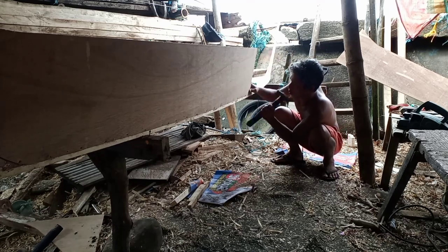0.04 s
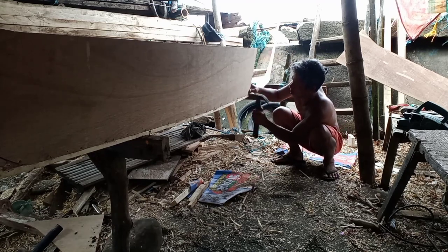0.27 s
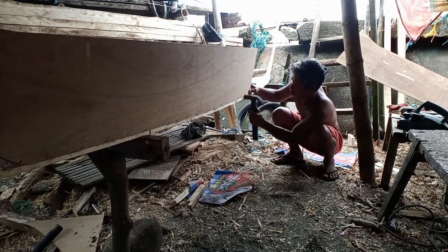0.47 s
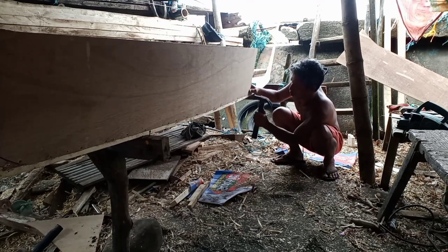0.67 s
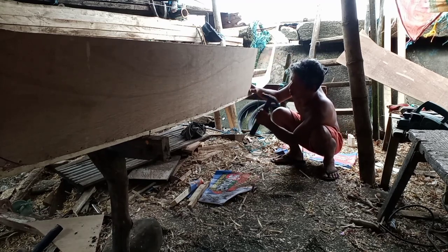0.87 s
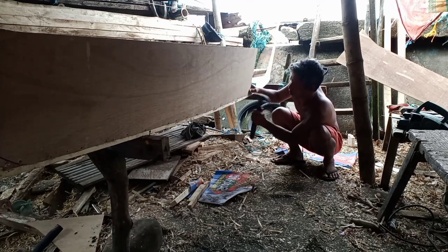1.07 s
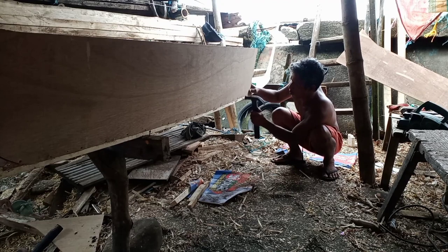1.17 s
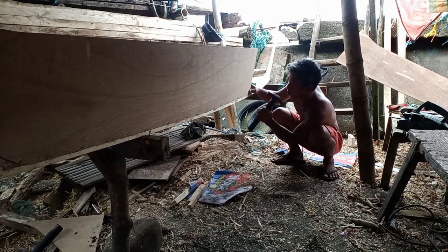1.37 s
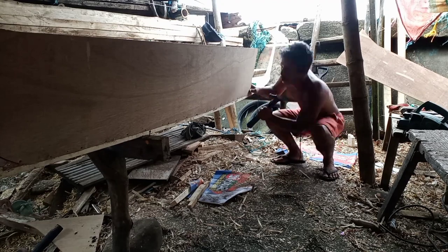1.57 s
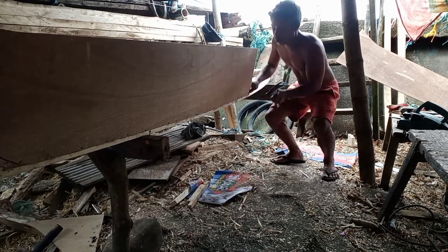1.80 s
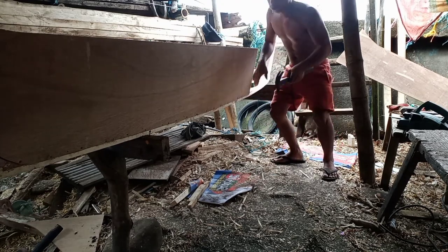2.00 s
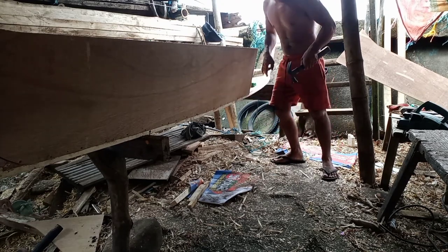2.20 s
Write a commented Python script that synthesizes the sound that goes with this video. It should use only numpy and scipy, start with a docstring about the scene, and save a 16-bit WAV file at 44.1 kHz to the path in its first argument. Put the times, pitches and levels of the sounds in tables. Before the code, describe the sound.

A hammer strikes a hollow plywood boat hull three times, sharp loud knocks in an open shed

```python
"""A hammer strikes the plywood hull of a boat in an open work shed; one blow falls just before the start.
Each blow is a burst of noise and damped modes of hull and steel, answered by a ground echo and the shed.
Light hammer touches, grainy rustles and scrapes and a faint hum lie over a low outdoor murmur of noise.
A phone microphone colours it all, and a look-ahead limiter ducks the sound just before loud peaks."""
import sys
import numpy as np
from scipy import signal
from scipy.fft import rfft, irfft, next_fast_len
from scipy.io import wavfile
from scipy.ndimage import uniform_filter1d, minimum_filter1d, map_coordinates

SR = 44100
rng = np.random.default_rng(int(sys.argv[2]) if len(sys.argv) > 2 else 0)


def unload_wav(signal):
    """Save mono or channel-first audio to the path in sys.argv[1] as 16-bit WAV at rate SR, clipped to [-1, 1]."""
    wavfile.write(
        sys.argv[1],
        SR,
        np.round(np.clip(np.atleast_2d(signal).T, -1, 1) * 32767).astype(np.int16),
    )


N = 99225
LEAD_S = 0.4  # computed before time zero, to hold the early blow
LEAD = round(LEAD_S * SR)
M = N + LEAD
T = np.arange(M) / SR - LEAD_S
# All levels below are those ahead of the microphone and limiter.


def amp(db):
    """Decibel law: amplitude is ten to the power of dB / 20."""
    return 10 ** (np.asarray(db) / 20)


def unit(x):
    """Normalisation to a root-mean-square of one."""
    return x / np.sqrt(np.mean(x ** 2) + 1e-20)


def along(points, hz):
    """Interpolation of (Hz, value) points on a logarithmic frequency axis."""
    f, v = np.transpose(points)
    return np.interp(np.log(hz + 1), np.log(f + 1), v)


def filtered(x, response):
    """Linear filtering: the spectrum is multiplied by a complex response of frequency."""
    m = next_fast_len(x.shape[-1] + SR // 2)
    spectrum = rfft(x, m) * response(np.fft.rfftfreq(m, 1 / SR))
    return irfft(spectrum, m)[..., :x.shape[-1]]


def causal(points):
    """Minimum phase: folding the cepstrum of (Hz, dB) points leaves no sound before its cause."""
    def response(hz):
        cepstrum = irfft(np.log(amp(along(points, hz))))
        half = len(cepstrum) // 2
        cepstrum[1:half] *= 2
        cepstrum[half + 1:] = 0
        return np.exp(rfft(cepstrum))
    return response


def late(x, delay_s):
    """Propagation delay: the same wave arrives later."""
    return np.pad(x, (round(delay_s * SR), 0))[:len(x)]


def dying(t60s):
    """Frequency-dependent damping: one second of noise, each band losing 60 dB in its own time."""
    hz, t, z = signal.stft(rng.standard_normal(SR), SR, nperseg=256)
    decay = amp(-60 * t / along(t60s, hz)[:, None])
    return signal.istft(z * decay, SR, nperseg=256)[1][:SR]


def ringing(modes, attack_s, scatter_db):
    """Modal superposition: one second of damped sines, their levels scattered at random per strike."""
    t = np.arange(SR) / SR
    out = np.zeros(SR)
    for pitch_hz, level_db, t60_s, *start_factor in modes:
        decay = amp(level_db + scatter_db * rng.normal() - 60 * t / t60_s)
        out += np.prod(start_factor) * decay * np.sin(2 * np.pi * pitch_hz * t)
    return out * (1 - np.exp(-t / attack_s))


GRAINS_PER_S, GRAIN_DB = 500, 3.5  # mean rate; mean of the exponentially spread grain level
RISE_S, FALL_S = 0.0021, 0.018  # linear rise; time constant of the fall


def grit(rows):
    """Friction as grainy noise: returns the stroke envelope and the noise separately."""
    shape = np.zeros(M)
    for start_s, length_s, level_db in rows:
        rise = np.clip((T - start_s) / RISE_S, 0, 1)
        fall = np.exp(-np.clip(T - start_s - length_s, 0, None) / FALL_S)
        shape += amp(level_db) * rise * fall
    present = rng.random(M) < GRAINS_PER_S / SR
    grains = present * amp(GRAIN_DB * rng.exponential(size=M))
    return shape, rng.standard_normal(M) * (1 + grains)


# Relative spectrum of the outdoor murmur: pitch_hz [Hz], level_db [dB]
MURMUR_COLOUR = [(30, -13), (60, -4), (100, -2.5), (200, 3.5), (400, -3), (800, -10), (1500, -16.5),
                 (3000, -23), (8000, -38.5), (16000, -32.5)]
# Course of the murmur's loudness: start_s [s], level_db [dB]
MURMUR_COURSE = [(0, -47), (.2, -40), (.45, -39), (.7, -42), (.95, -40), (1.15, -43), (1.4, -46),
                 (1.55, -40.5), (1.85, -43), (2.25, -40.5)]


def murmur():
    """Coloured noise: low outdoor sound with patches of random gain in time and frequency."""
    z = signal.stft(rng.standard_normal(M), nperseg=1024)[2]
    field = uniform_filter1d(rng.standard_normal(z.shape), 8, 0)
    field = uniform_filter1d(field, 5, 1)
    patch_gain = amp(2.27 * unit(field))  # 2.27 dB rms
    noise = signal.istft(z * patch_gain, nperseg=1024)[1][:M]
    coloured = filtered(noise, lambda hz: amp(along(MURMUR_COLOUR, hz)))
    return amp(np.interp(T, *np.transpose(MURMUR_COURSE))) * unit(coloured)


HUM_HZ, HUM_WIDTH_HZ = 96.5, 13  # centre; distance at which the gain is 1/e
# Course of the distant hum's loudness: start_s [s], level_db [dB]
HUM_COURSE = [(0, -47.5), (1.45, -54.5), (1.56, -41), (1.73, -44), (1.82, -51), (2.25, -52.5)]


def hum():
    """Narrow-band noise: a small bandwidth makes a low tone of unsteady level."""
    tone = filtered(rng.standard_normal(M), lambda hz: np.exp(-((hz - HUM_HZ) / HUM_WIDTH_HZ) ** 2))
    return amp(np.interp(T, *np.transpose(HUM_COURSE))) * unit(tone)


# Rustles of hands and feet: start_s [s], length_s [s], level_db [dB], extra treble_db [dB]
RUSTLE_STROKES = [(0.122, 0.094, -57, -3), (0.459, 0.033, -48, 0.5), (0.71, 0.06, -50, -8),
                  (0.784, 0.044, -58, 1), (0.857, 0.14, -55.5, 1.5), (1.04, 0.013, -56, 6.5),
                  (1.088, .03, -51, -7), (1.134, 0.0095, -48.5, 6), (1.42, .04, -58, -1),
                  (1.549, 0.081, -58, 2), (1.7, 0.016, -56, 2), (1.887, 0.031, -56.5, 7),
                  (2.16, 0.01, -56, 4), (2.224, .05, -43.5, 2.5)]
# Relative spectrum of a rustle: pitch_hz [Hz], level_db [dB]
RUSTLE_COLOUR = [(300, -32.5), (1000, 15), (2500, 9.5), (7000, -2), (16000, -4.5)]


def rustles():
    """Friction noise: short grainy strokes, each with its own balance about 5 kHz."""
    shape, noise = grit([row[:3] for row in RUSTLE_STROKES])
    bright_rows = [(start_s, length_s, level_db + treble_db)
                   for start_s, length_s, level_db, treble_db in RUSTLE_STROKES]
    bright_shape, _ = grit(bright_rows)
    noise = unit(filtered(noise, causal(RUSTLE_COLOUR)))
    low = filtered(noise, lambda hz: hz < 5000)
    return shape * low + bright_shape * (noise - low)


# Strokes of something dragged over wood: start_s [s], length_s [s], level_db [dB]
SCRAPE_STROKES = [(.34, 0.047, -44.5), (.89, 0.035, -47.5), (.94, 0.033, -51.5), (2.012, 0.038, -42.5),
                  (2.065, 0.032, -46), (2.115, 0.031, -48.5), (2.15, 0.043, -44.5)]
# Relative resonances of the dragged thing: pitch_hz [Hz], width_hz [Hz], level_db [dB]
DRAGGED_BODY = [(1103, 73, 2.5), (1330, 117, -1.5), (1814, 64, 1.5), (2200, 90, -1.5), (2850, 440, -9),
                (3740, 130, -14)]


def scrapes():
    """Source and resonator: friction grains excite the resonances of the dragged thing."""
    shape, noise = grit(SCRAPE_STROKES)

    def body(hz):
        total = 0
        for k, (pitch_hz, width_hz, level_db) in enumerate(DRAGGED_BODY):
            damping = 1j * hz * width_hz
            sign = (-1) ** k  # neighbouring resonances alternate in sign
            total = total + sign * amp(level_db) * damping / (pitch_hz ** 2 - hz ** 2 + damping)
        return total
    return shape * unit(filtered(noise, body))


# Light touches of the hammer head: start_s [s], level_db [dB]
TOUCHES = [(.645, -31.5), (.711, -23)]
# Modes of a touch, relative to its level: pitch_hz [Hz], level_db [dB], t60_s [s]
TOUCH_MODES = [(575, -1, 0.054), (698, -2.5, 0.068), (780, -0.5, 0.05), (920, -8, 0.06),
               (1044, -4.5, 0.034), (1920, -16.5, 0.044)]


def taps():
    """Impulsive excitation: each light touch sets a few damped modes ringing."""
    out = np.zeros(M + SR)
    for start_s, level_db in TOUCHES:
        ring = ringing(TOUCH_MODES, attack_s=0.0011, scatter_db=3.7)
        out[round((start_s + LEAD_S) * SR):][:SR] += amp(level_db) * ring
    return out[:M]


SHED_DB, SHED_DELAY_S = -19.5, 0.02
# Reverberation time of the shed: pitch_hz [Hz], t60_s [s]
SHED_T60 = [(100, 0.69), (300, 0.27), (1000, 0.32), (4000, 0.22), (12000, 0.12)]
# Relative spectrum of the reverberation: pitch_hz [Hz], level_db [dB]
SHED_SPECTRUM = [(60, -45), (110, 0.5), (220, 5), (500, -0.5), (4000, -2)]


def shed(hit):
    """Reverberation: the hit convolved with delayed, dying noise of unit energy."""
    tail = late(filtered(dying(SHED_T60), causal(SHED_SPECTRUM)), SHED_DELAY_S)
    return amp(SHED_DB) * signal.fftconvolve(hit, tail / np.linalg.norm(tail))[:SR]


# Hammer-head modes, relative to the blow and its crack_db: pitch_hz [Hz], level_db [dB], t60_s [s]
STEEL_MODES = [(2221, -30, 0.083), (7340, -36, .03), (14340, -31, .025)]


def steel():
    """Free vibration: the struck hammer head rings in its own high modes."""
    return ringing(STEEL_MODES, attack_s=0.00069, scatter_db=2.5)


RING_LAG_S = 0.00139  # the boom arrives after the crack
# Hull modes: pitch_hz [Hz], level_db before the factor, relative to the blow [dB], t60_s [s],
# start_factor [signed gain: positive starts outward, negative inward]
HULL_MODES = [(115.7, -19.5, 0.12, 0.85), (139.5, -26, 0.19, -1.2), (203.8, -10.5, 0.11, -0.58),
              (224.6, -23, 0.2, -1.22), (278.6, -9, 0.18, -0.65), (320.3, -17.5, 0.17, 0.95),
              (361.8, 1.5, 0.049, -0.97), (417.6, -12, 0.12, -0.87), (480.4, -7, 0.059, 0.94),
              (523, -17.5, 0.15, 0.72), (569, -1.5, 0.036, 0.78), (690, -20.5, 0.084, 1),
              (751, -18.5, 0.041, 1), (832, -15, 0.033, -1.2), (1060, -24, 0.067, 0.75),
              (1351, -18.5, 0.061, -1.13)]


def hull():
    """Panel vibration: the plywood booms in damped modes that build up just after contact."""
    return late(ringing(HULL_MODES, attack_s=0.0058, scatter_db=1.27), RING_LAG_S)


LUMP_DB, LUMP_S = 2.5, 0.004  # depth and spacing of the unevenness
CRACK_ATTACK_S = 0.0026  # time constant
# Relative spectrum of the crack: pitch_hz [Hz], level_db [dB]
CRACK_COLOUR = [(60, -76), (110, -13), (300, -15), (700, -7), (1500, -17), (3000, -17), (8000, -27),
                (12000, -35), (16000, -38)]
# Decay time of the crack: pitch_hz [Hz], t60_s [s]
CRACK_DECAY = [(100, 0.39), (400, 0.16), (1500, 0.17), (4000, 0.1), (8000, .1), (11000, 0.08), (16000, .12)]


def cracks(top_db):
    """Contact noise: two independent noises share uneven lumps and die band by band."""
    t = np.arange(SR) / SR
    knots = rng.standard_normal(round(1 / LUMP_S) + 4)
    lumps = amp(LUMP_DB * map_coordinates(knots, [t / LUMP_S]))
    noise = np.array([dying(CRACK_DECAY), dying(CRACK_DECAY)])
    noise = noise * lumps * (1 - np.exp(-t / CRACK_ATTACK_S))
    # top_db lifts only the spectrum points above 9 kHz
    colour = [(hz, db + top_db * (hz > 9000)) for hz, db in CRACK_COLOUR]
    return filtered(noise, causal(colour))


CRACK_DB = 5  # common to all cracks
ECHO_S, ECHO_DB = 0.00928, -13  # off the ground
SIDE_HZ = 4530  # the left-right treble noise is full above this and fades out below
# Blows: start_s [s], level_db [dB], extra crack_db [dB], extra top_db above 9 kHz [dB],
# side_db of the separate left-right treble noise, relative to the crack [dB]
HAMMER_BLOWS = [(-.13, 14, -0.5, 6, -20), (0.246, 16, -3.5, -1, -2.5), (0.4994, 16.5, -1.5, 1, -24.5),
                (1.1797, 18, -1, 7.5, -23.5)]


def hammer():
    """Impact and reflection: crack, hull and steel sound, ground and shed answer. Rows: middle, side."""
    out = np.zeros((2, M + SR))
    for start_s, level_db, crack_db, top_db, side_db in HAMMER_BLOWS:
        crack, other = amp(CRACK_DB + crack_db) * cracks(top_db)
        hit = hull() + crack + amp(crack_db) * steel()
        hit = hit + amp(ECHO_DB) * late(hit, ECHO_S)
        hit = hit + shed(hit)
        treble = filtered(other, causal([(SIDE_HZ * 0.62, -80), (SIDE_HZ, 0)]))
        blow = np.array([hit, amp(side_db) * treble])
        out[:, round((start_s + LEAD_S) * SR):][:, :SR] += amp(level_db) * blow
    return out[:, :M]


# Response of the phone microphone: pitch_hz [Hz], level_db [dB]
MIC_RESPONSE = [(30, -7.5), (100, -4), (3600, -2), (4200, -10.5), (5000, -21), (6000, -14.5), (7200, 1.5),
                (8500, -7.5), (10000, -16), (12000, -20), (14300, -18.5), (15300, -15), (15700, -26)]


def microphone(mid, side):
    """Transduction: left is middle plus side, right middle minus side, both through one minimum-phase response."""
    left_right = np.array([mid + side, mid - side])
    return filtered(left_right, causal(MIC_RESPONSE))


CEILING_DB, AHEAD_S = -1.2, 0.025  # dB re full scale; look-ahead
DUCK_S, RELEASE_DB_PER_S = 0.01, 69  # gain smoothing; recovery rate


def limiter(x):
    """Dynamic range control: gain drops ahead of a peak over the ceiling, then climbs steadily in dB."""
    ahead = round(AHEAD_S * SR)
    over_db = np.clip(20 * np.log10(np.abs(x).max(axis=0) + 1e-9) - CEILING_DB, 0, None)
    over_db = -minimum_filter1d(-over_db, ahead + 1, origin=-(ahead // 2))  # largest excess to come
    ramp = RELEASE_DB_PER_S * np.arange(M) / SR
    over_db = np.maximum.accumulate(over_db + ramp) - ramp
    return x * amp(-uniform_filter1d(over_db, max(round(DUCK_S * SR), 1)))


def scene():
    """Superposition: all sources add, then pass microphone and limiter, which recovers from the early blow."""
    mid, side = hammer()
    mid = mid + murmur() + hum() + rustles() + scrapes() + taps()
    return limiter(microphone(mid, side))[:, LEAD:]


def record(dry):
    """Band limitation: nothing passes at 16 kHz or above."""
    return filtered(dry, lambda hz: hz < 16000)


dry = scene()
out = record(dry)
unload_wav(out)
```